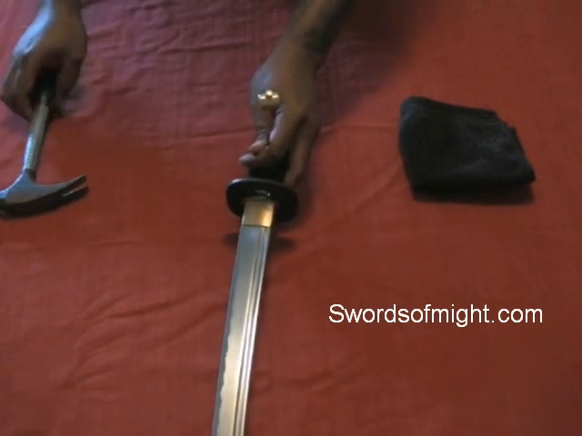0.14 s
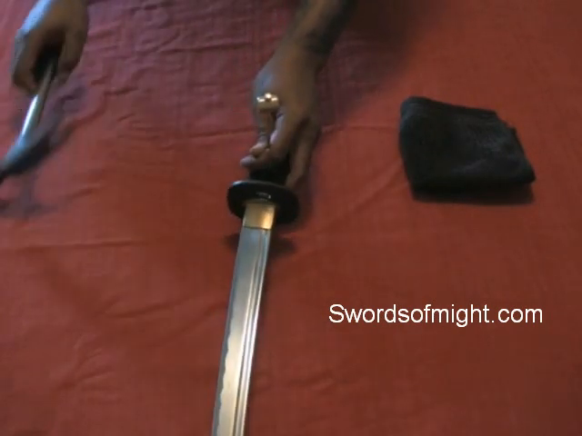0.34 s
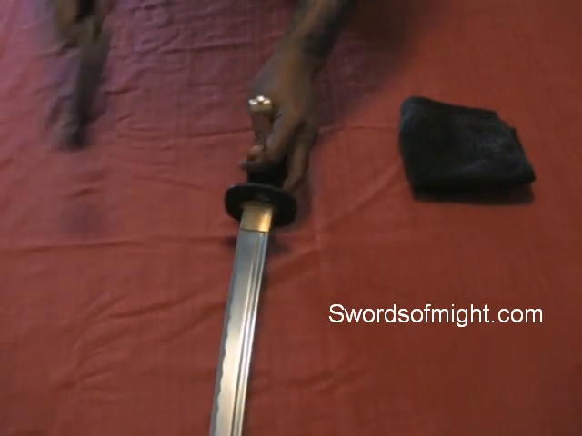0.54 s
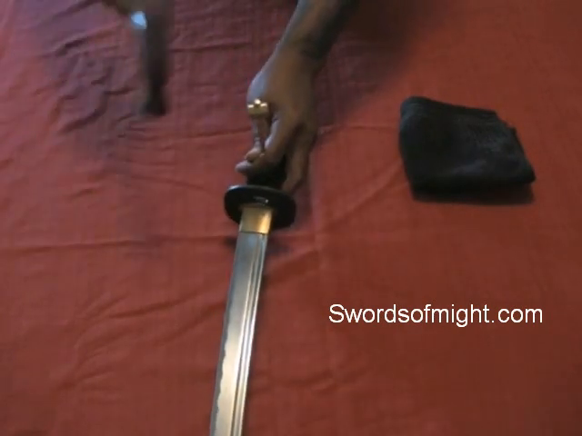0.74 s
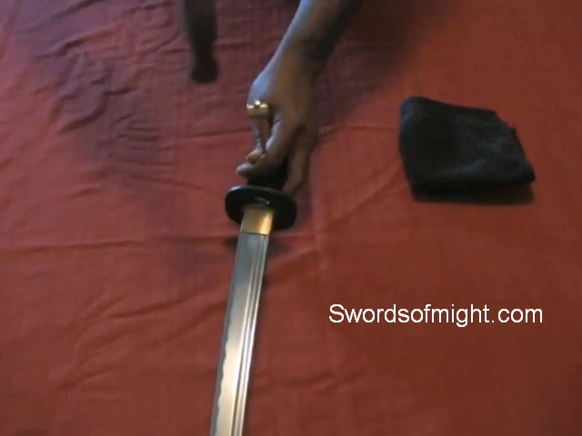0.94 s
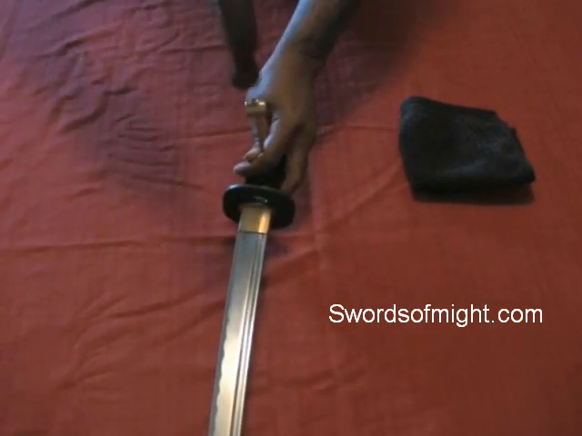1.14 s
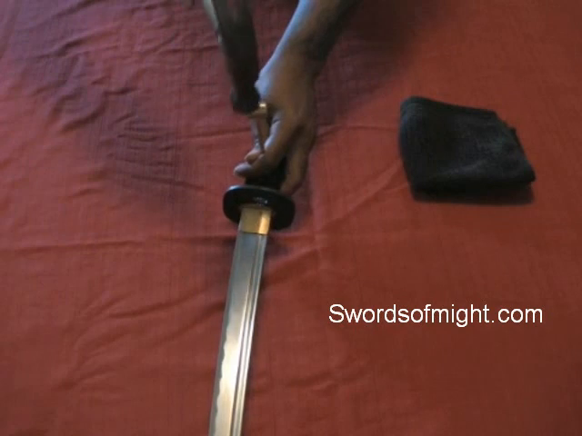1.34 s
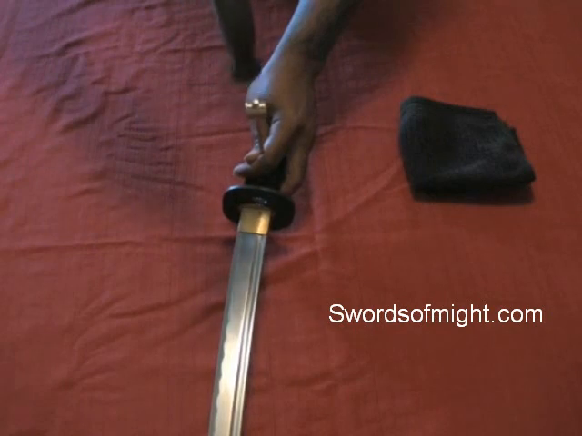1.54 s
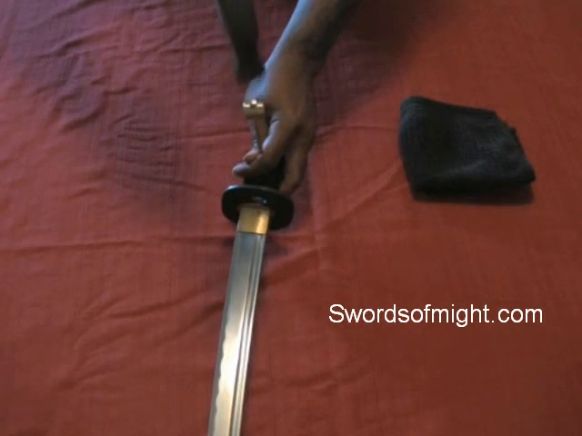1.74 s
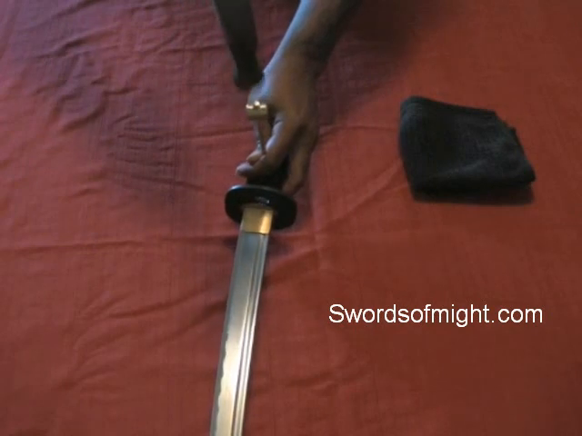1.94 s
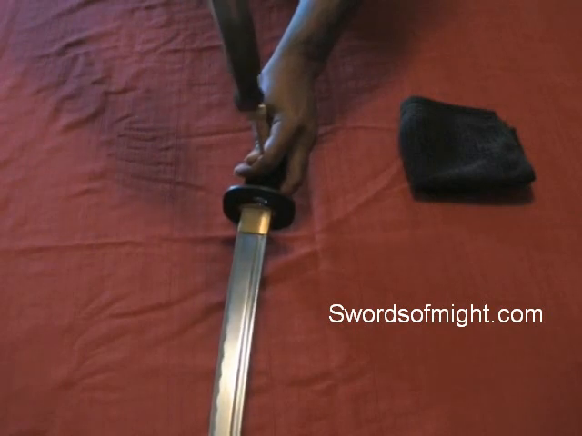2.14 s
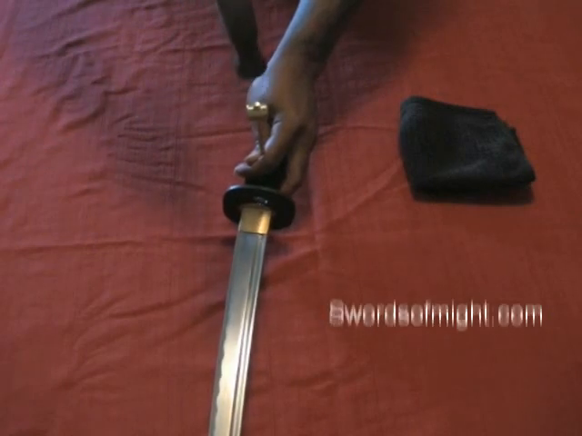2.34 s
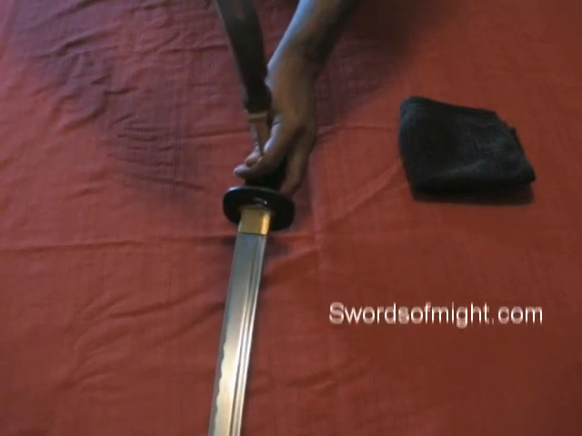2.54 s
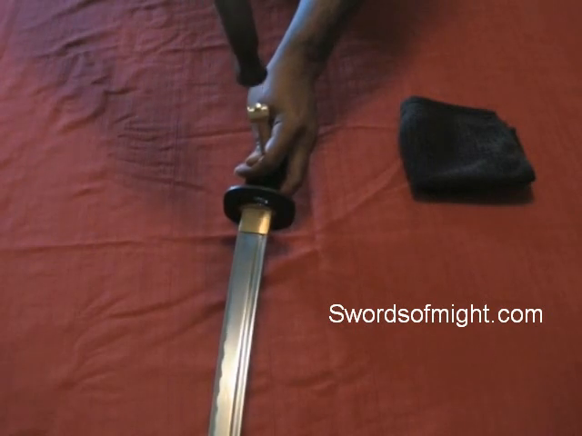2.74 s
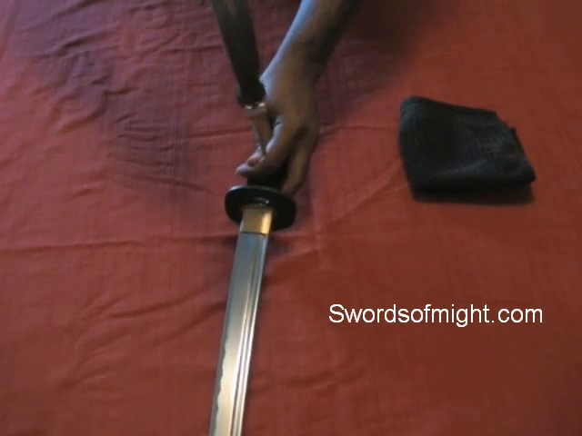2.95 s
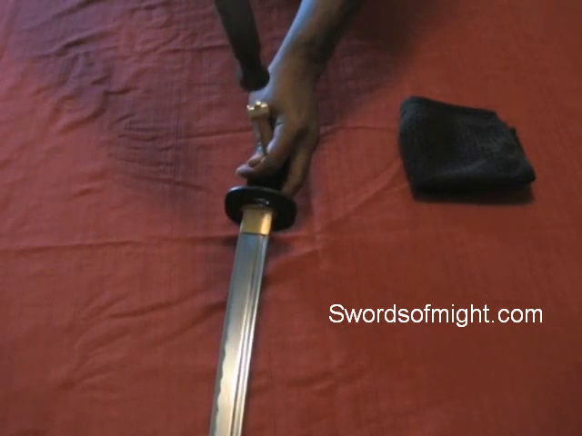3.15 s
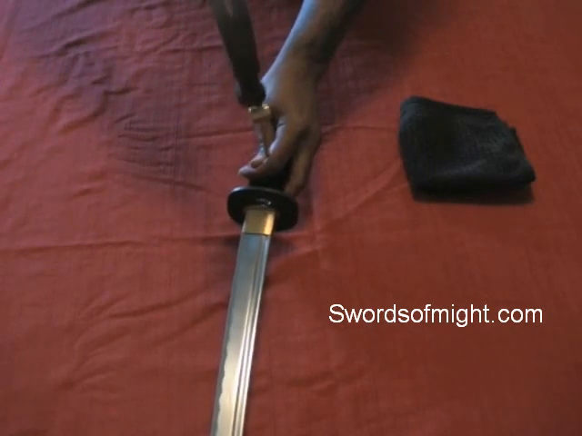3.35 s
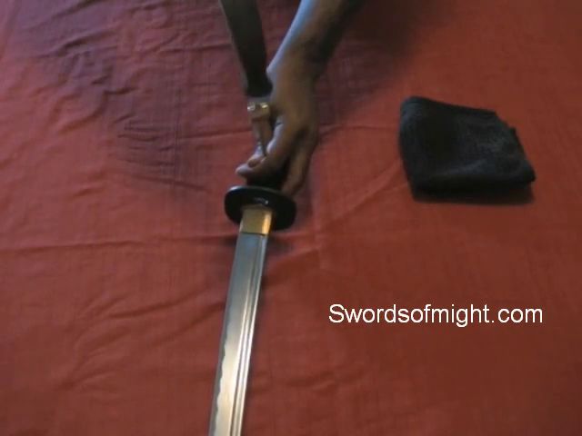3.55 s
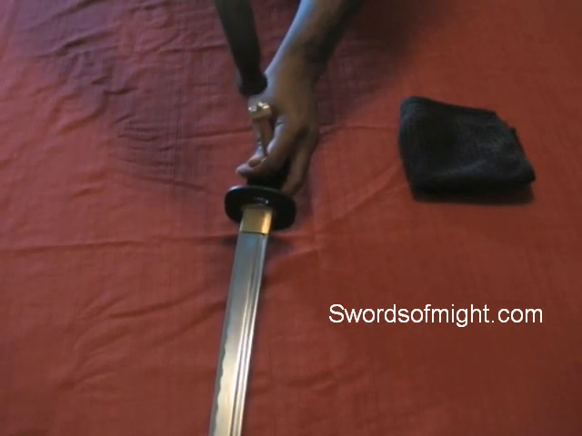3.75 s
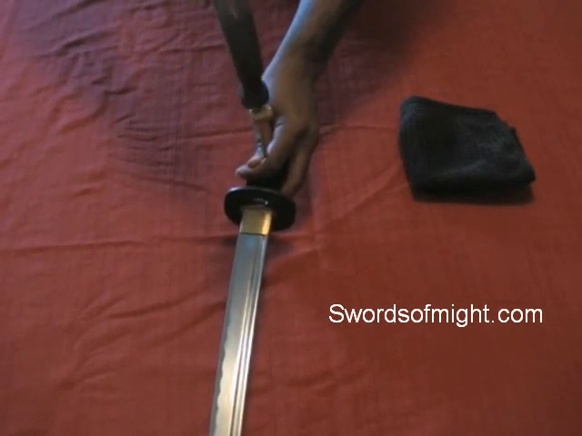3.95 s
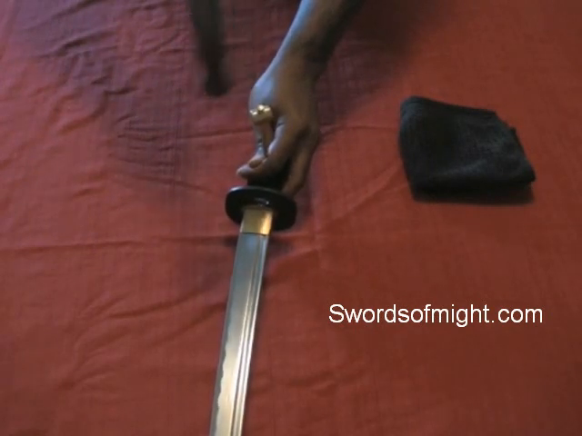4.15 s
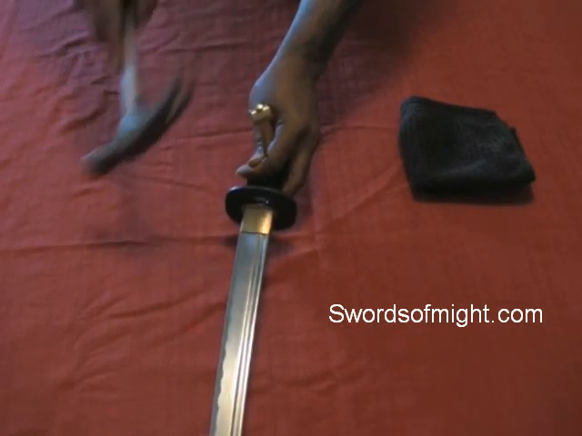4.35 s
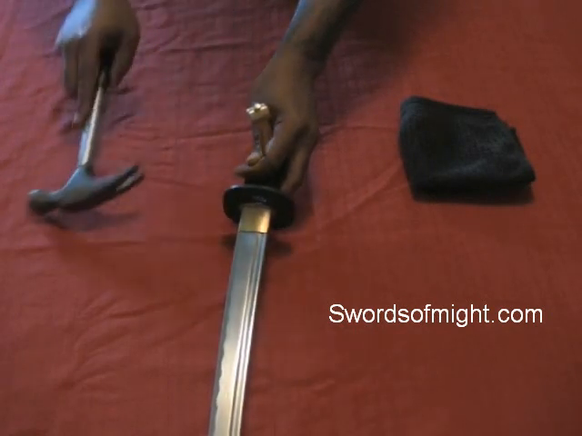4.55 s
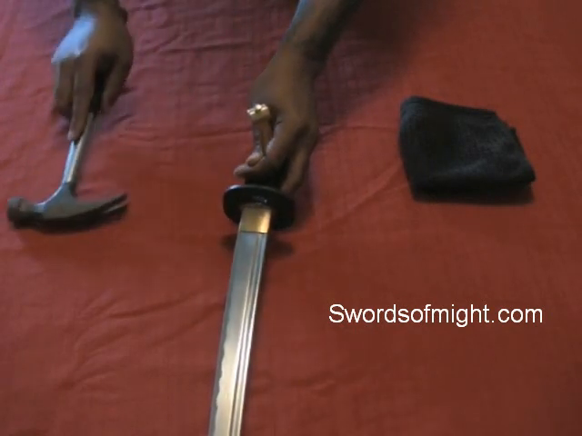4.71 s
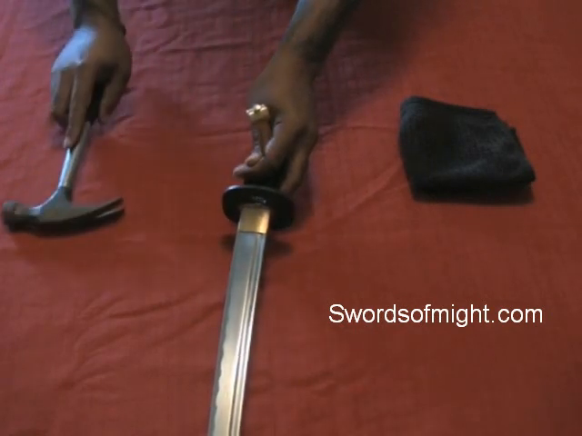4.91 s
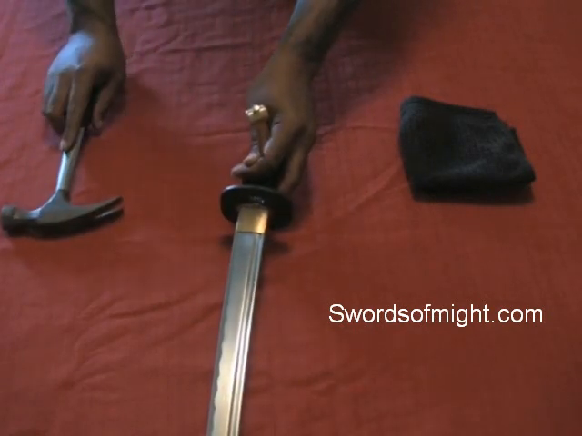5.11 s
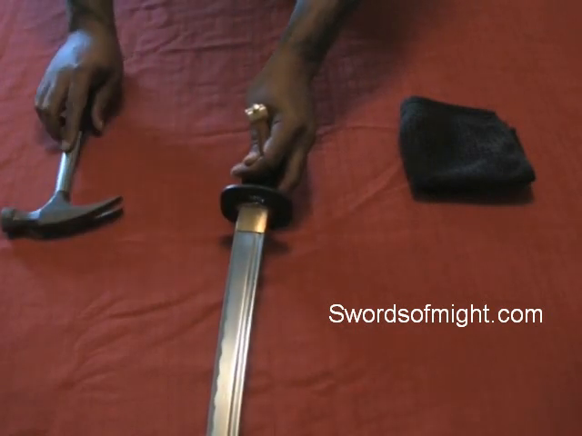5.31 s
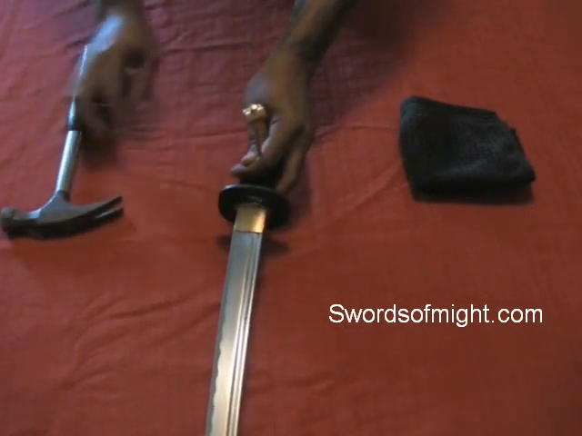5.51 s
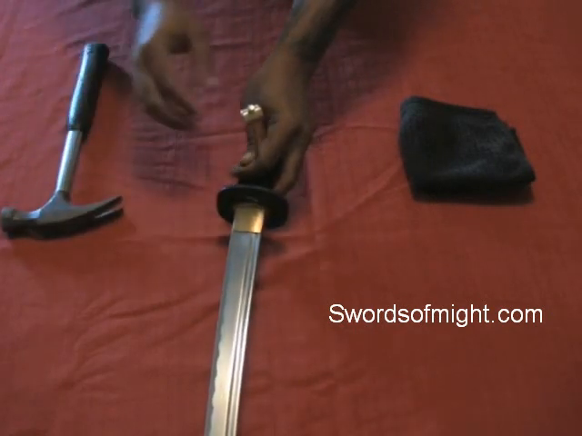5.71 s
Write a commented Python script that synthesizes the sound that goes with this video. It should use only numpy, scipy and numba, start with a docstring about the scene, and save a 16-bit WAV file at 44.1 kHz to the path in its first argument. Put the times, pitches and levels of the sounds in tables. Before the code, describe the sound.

A hammer is picked up with a tiny click, then taps a brass punch against a sword handle eight times. Each tap is a hard metal crack with a brief ring and a boom from the table beneath. The hammer is then laid on the cloth-covered table with two dull thuds. The microphone is close, in a small, slightly echoing room with faint hiss and a thin motor whine.

```python
"""Hammer and punch on a sword handle

A claw hammer taps a brass punch eight times against a sword handle on a cloth-covered table in a small
room. Each tap is a hard metal crack; the punch rings, the table top booms, the room answers. Blow by blow
the punch sits looser and rebounds later and louder. The hammer clicks when picked up and thuds twice when
laid down. A camera with a faint motor whine and a fast limiter stands close by."""
import sys
import numpy as np
from scipy import signal
from scipy.fft import rfft, irfft
from scipy.io import wavfile
from numba import njit

SR = 44100
rng = np.random.default_rng(int(sys.argv[2]) if len(sys.argv) > 2 else 0)


def to_wav(sig):
    """Store sig (one row per channel, or 1-D mono) as 16-bit WAV at the path in sys.argv[1].

    Samples outside -1..1 are clipped; the rate is SR.
    """
    pcm = np.clip(np.atleast_2d(sig), -1, 1) * 32767
    pcm = np.round(pcm).astype(np.int16)
    wavfile.write(sys.argv[1], SR, pcm.T)  # frames by channels


N = 259040
EVENT_SAMPLES = 32768
AGE_S = np.arange(EVENT_SAMPLES) / SR
FREE_GAP_S = 0.0025  # rebound gap beyond which the punch hardly drives the table


def undb(db):
    """Decibels to gain."""
    return 10 ** (np.asarray(db) / 20)


def along(hz, points):
    """Interpolate (f/Hz, value) points over log frequency."""
    f, value = np.transpose(points)
    return np.interp(np.log(np.maximum(hz, 1)), np.log(f), value)


def colour(x, points, peaks=()):
    """Minimum-phase filter from points (f/Hz, level/dB) and peaks (f/Hz, width/Hz, lift/dB)."""
    size = 2 * len(x)
    hz = np.fft.rfftfreq(size, 1 / SR)
    lift_db = sum(db / (1 + (2 * (hz - centre) / width) ** 2) for centre, width, db in peaks)
    cepstrum = irfft(np.log(undb(along(hz, points) + lift_db)), size)
    cepstrum[1:size // 2] *= 2
    cepstrum[size // 2 + 1:] = 0
    return irfft(rfft(x, size) * np.exp(rfft(cepstrum)))[:len(x)]


def fade(t60_s, rise_s=0.):
    """Exponential rise and decay."""
    return np.exp(-np.log(1000) * AGE_S / t60_s) * (1 - np.exp(-AGE_S / max(rise_s, 1 / SR)))


def delay(x, lag_s):
    """Fractional delay by phase shift."""
    size = 2 * len(x)
    hz = np.fft.rfftfreq(size, 1 / SR)
    return irfft(rfft(x, size) * np.exp(-2j * np.pi * hz * lag_s))[:len(x)]


def add(out, t_s, sound):
    """Mix a sound in at t_s."""
    start = int(t_s * SR)
    part = sound[..., :out.shape[-1] - start]
    out[..., start:start + part.shape[-1]] += part


def stereo(mid, side):
    """Mid/side to left/right."""
    return np.array([mid + side, mid - side])


def ring(modes, rise_s, detune):
    """Decaying modes with random phase and slight random detuning."""
    draws = rng.standard_normal((len(modes), 2))
    return sum(undb(db) * fade(t60_s, rise_s) * np.sin(2 * np.pi * (hz * (1 + detune * z) * AGE_S + phase))
               for (hz, db, t60_s), (z, phase) in zip(modes, draws))


def burst(t60_s, rise_s=0.):
    """Dense, heavily damped modes, heard as a short noise."""
    return rng.standard_normal(EVENT_SAMPLES) * fade(t60_s, rise_s)


def background_hiss():
    """Steady, dark, nearly mono noise."""
    # background hiss spectrum, cut off above 13 kHz: f/Hz, level/dB
    spectrum = [(20, -22), (30, -13), (42, -10.5), (90, -18.5), (160, -12), (250, -3.5), (380, -7),
                (600, -10), (1000, -12), (1250, -16.5), (3000, -25), (5900, -31), (7500, -35),
                (13000, -36.5), (13800, -85)]
    mid, side = (colour(rng.standard_normal(N), spectrum) for _ in range(2))
    return undb(-44) * stereo(mid, undb(-42.5) * side) / np.std(mid)


def hum_and_motor():
    """Low hum and thin camera motor lines, drifting in phase."""
    # steady tones: f/Hz, rms level/dB
    tones = [(26.9, -54.5), (446.8, -57.5), (985.1, -60.5), (4194, -70.5), (4495, -69.5), (4797, -72),
             (5394, -75.5), (5992, -72)]
    t_s = np.arange(N) / SR
    drifts_rad = 0.0053 * np.cumsum(rng.standard_normal((len(tones), N)), axis=1)
    return sum(np.sqrt(2) * undb(db) * np.sin(2 * np.pi * hz * t_s + drift)
               for (hz, db), drift in zip(tones, drifts_rad))


def pickup_click(level_db):
    """Tiny bright metal contact with a faint echo."""
    # click spectrum: f/Hz, level/dB
    spectrum = [(500, -34), (2000, -3), (6500, -10.5), (8000, 0), (10000, -1), (13500, -5), (15500, -28)]
    echo = undb(-30.5) * room_echo(rise_s=0.0008) * fade(t60_s=2.9)
    return undb(level_db) * colour(burst(t60_s=0.0015) + echo, spectrum)


def room_echo(rise_s):
    """Diffuse impulse response; the top treble dies first."""
    # reverberation time: f/Hz, t60/s
    decay = [(150, 0.46), (600, 0.55), (2000, 0.57), (4500, 0.62), (9000, 0.51), (14000, 0.39)]
    centres_hz, t60s = np.transpose(decay)
    hz = np.fft.rfftfreq(EVENT_SAMPLES, 1 / SR)
    noise = rfft(rng.standard_normal(EVENT_SAMPLES))
    bands = [along(hz, np.column_stack([centres_hz, share])) for share in np.eye(len(t60s))]
    return sum(irfft(noise * band) * fade(t60_s, rise_s) for band, t60_s in zip(bands, t60s))


def punch_tap(level_db, corner_hz, treble_db, gap_s, press_db, ring_db):
    """One blow: crack, rebound, punch ring and table boom."""
    # each tap's treble is dulled or slightly lifted above its own corner
    half_step = 2 ** 0.51
    contact = [(corner_hz / half_step, level_db), (corner_hz * half_step, level_db + treble_db)]
    crack, side = metal_crack(contact, gap_s)
    metal = rebound(crack, gap_s) + undb(ring_db) * metal_ring()
    return stereo(metal + table_boom(level_db, gap_s, press_db), side)


def metal_crack(contact, gap_s):
    """Sword and table top scatter the blow for milliseconds; the walls echo it. Returns mid, side."""
    # crack spectrum: f/Hz, level/dB
    spectrum = [(80, -29), (600, -8), (1100, -5.5), (1700, 5), (2600, -0.5), (3400, -1.5), (5000, 1.5),
                (6600, 1.5), (8400, -2), (10000, -1), (11800, -9.5), (14500, -18.5), (16000, 3)]
    # left-right difference: f/Hz, level/dB
    spread = [(600, -46), (1800, -30.5), (4000, -21), (9000, -18)]
    # wall echo spectrum: f/Hz, level/dB
    tail = [(100, -37), (1200, -2), (1500, 1), (2100, 1), (3100, -2.5), (4300, 0), (5600, -1), (7300, -0.5),
            (8600, -3), (10300, -6.5), (12000, -9.5), (13500, -17), (15000, -42)]
    mid, side = (undb(5) * colour(burst(t60_s=0.019, rise_s=0.0012), spectrum) for _ in range(2))
    side = colour(colour(side, contact), spread)
    walls = undb(-16) * colour(room_echo(rise_s=0.0072), tail)
    return colour(mid + walls, contact, struck_resonances(gap_s)), side


def tightness(gap_s):
    """Seating of the punch: 1 tight, towards 0 free."""
    return 1 / np.sqrt(1 + (gap_s / FREE_GAP_S) ** 6.7)


def struck_resonances(gap_s):
    """Each blow lands on another spot and favours other resonances; a free punch evens them out."""
    # hand-damped resonances of hammer, punch and handle: f/Hz, width/Hz, lift/dB
    peaks = [(1450, 210, 0.5), (1960, 120, 2), (2120, 61, 1.5), (2550, 120, 6), (3030, 450, 5.5),
             (3596, 300, 4), (4035, 82, 8.5), (4246, 148, 5.5), (4580, 164, 7.5), (4360, 140, 1),
             (5060, 160, 5), (5310, 210, 4), (6450, 310, 7.5), (7500, 400, 3), (8650, 62, -6),
             (9400, 830, 3), (10300, 320, 4), (11500, 360, -1.5)]
    scatter_db = 1.8 * rng.standard_normal(len(peaks))
    depth = 1 - 0.54 * (1 - tightness(gap_s))
    return [(hz, width, depth * (db + extra)) for (hz, width, db), extra in zip(peaks, scatter_db)]


def rebound(crack, gap_s):
    """The second contact cuts a comb of notches; a longer gap comes back louder."""
    rebound_db = -10 + 3.5 * np.log2(gap_s / FREE_GAP_S)
    return crack + undb(rebound_db) * delay(crack, gap_s)


def metal_ring():
    """Punch and sword fittings ring on; the punch's close modes beat."""
    # punch modes: f/Hz, level/dB, t60/s
    punch = [(6215, -2, .42), (6250, 2, .5), (6272, -3, .42)]
    # sword fitting modes: f/Hz, level/dB, t60/s
    fittings = [(1990, -11.5, 0.59), (1960, -33, 0.42), (2100, -9, 0.6), (2449, -14.5, 0.94),
                (2560, -15, 0.24), (3770, -9, 0.38), (4400, -45, 0.27), (4600, -20, 0.63), (4820, -29, 1),
                (7160, -39, .4), (8900, 0, 0.15)]
    return ring(punch + fittings, rise_s=0.0013, detune=0.00025)


def table_boom(level_db, gap_s, press_db):
    """The heavy table starts late and slowly; handle pressure brings out modes around the main one."""
    # table top under the handle: f/Hz, level/dB, t60/s
    modes = [(171, -14, .55), (187, -15, .55), (256, -10, .45), (272, -8, .5), (364, -6, .5),
             (379, 1.5, .58), (402, -7, .55), (442, -9, .5), (479, -9, .5), (604, 0, .5), (679, -4, .55),
             (739, -9, .5), (838, -10, .53), (960, -11, .58), (1010, -15, .55), (1061, -12, .55),
             (1258, -19, .55)]
    # diffuse boom spectrum: f/Hz, level/dB
    tail = [(40, -12), (75, -9.5), (180, -6), (270, 0), (320, 1.5), (390, 10.5), (480, 4), (545, -1.5),
            (640, -0.5), (760, 2), (1030, 1.5), (1200, -18.5), (2000, -16), (4000, -58)]
    # blow-to-table coupling: f/Hz, level/dB, share of press_db
    coupling = [(285, -15.5, 0.65), (352, -16, 0.28), (474, -18.5, 0.99)]
    scatter_db = 1.5 * rng.standard_normal(len(modes))
    excited = [(hz, db + extra, t60_s) for (hz, db, t60_s), extra in zip(modes, scatter_db)]
    top = undb(-0.7) * ring(excited, rise_s=0.0064, detune=0.003)
    boom = undb(12) * colour(room_echo(rise_s=0.013), tail)
    drive = [(hz, level_db + db + share * press_db) for hz, db, share in coupling]
    return colour(delay(top + boom, lag_s=0.00303), drive) * tightness(gap_s)


def cloth_thud(level_db, pitch_hz, top_db, room_db):
    """Cloth softens the hammer's landing to a few low cycles and a faint tick; table and room answer."""
    # table top under the hammer: f/Hz, level/dB, t60/s
    modes = [(386.5, -5.5, 0.19), (544, -21, 0.12), (652, -28, 0.2)]
    # room boom spectrum: f/Hz, level/dB
    tail = [(50, -42), (110, -6), (200, -1), (290, 5.5), (400, -12), (560, -7.5), (800, -20), (1500, -47),
            (5000, -62), (12000, -73)]
    # near-wall reflections: lag/s, level/dB
    echoes = [(0.019, -6), (0.0416, -3), (.082, -2.5)]
    push = fade(t60_s=0.031, rise_s=0.0064) * np.sin(2 * np.pi * pitch_hz * AGE_S)
    top = undb(top_db) * ring(modes, rise_s=0.0014, detune=0.0024)
    tick = undb(-39) * colour(burst(t60_s=0.03), [(1000, -4), (4500, 7), (8000, -20), (14000, -35)])
    boom = undb(room_db) * colour(room_echo(rise_s=0.0061), tail)
    sound = undb(8.5) * push + top + tick + boom
    for lag_s, echo_db in echoes:
        add(sound, lag_s, undb(echo_db) * push)
    return undb(level_db) * sound


def scene():
    """Taps, thuds and click over the quiet room."""
    # hammer on punch: t/s, level/dB, contact corner/Hz, treble step/dB, rebound gap/s,
    # handle pressure/dB, ring/dB
    taps = [(1.3416, -2.5, 5200, -18, 0.000385, 0.5, -68), (1.8511, 7, 6760, -14, 0.00047, -7.5, -48),
            (2.2097, -2.5, 8760, -0.5, .00075, 6.5, -51), (2.5612, -1.5, 9600, 3, 0.0007, 4.5, -48),
            (2.9042, -2.5, 9900, 0.5, 0.001, -2.5, -37), (3.3430, 1, 2980, -7.5, .00111, -4, -31.5),
            (3.6599, -2.5, 2700, -2, .00146, -6.5, -44), (3.9524, -6.5, 2920, 1, .0044, -3, -50)]
    # hammer head, then grip, laid down: t/s, level/dB, f/Hz, table top/dB, room/dB
    thuds = [(4.8067, -13.5, 173, -4.5, 5.5), (5.3940, -3, 252, -13.5, 0)]
    # hammer picked up: t/s, level/dB
    clicks = [(0.2707, -4.5)]
    out = background_hiss() + hum_and_motor()
    for source, events in (punch_tap, taps), (cloth_thud, thuds), (pickup_click, clicks):
        for t_s, *settings in events:
            add(out, t_s, source(*settings))
    return out


@njit
def follow(x, attack_s, release_s):
    """One-pole level detector."""
    envelope, level = np.empty(len(x)), 0.
    for i in range(len(x)):
        level += (x[i] - level) / (SR * (attack_s if x[i] > level else release_s))
        envelope[i] = level
    return envelope


def record(dry):
    """Camera limiter, soft clip and low-pass: the first milliseconds overload, the tail is held down."""
    threshold_db, ceiling, cutoff_hz = -9.5, 0.93, 15400
    envelope = follow(np.abs(dry.mean(axis=0)), attack_s=0.0022, release_s=0.08)
    limited = dry * np.minimum(1, undb(threshold_db) / np.maximum(envelope, 1e-9))
    clipped = limited / (1 + (limited / ceiling) ** 6) ** (1 / 6)
    return signal.sosfilt(signal.ellip(8, 0.2, 70, cutoff_hz, fs=SR, output="sos"), clipped)


dry = scene()
out = record(dry)
to_wav(out)
```